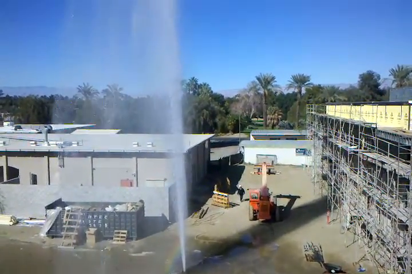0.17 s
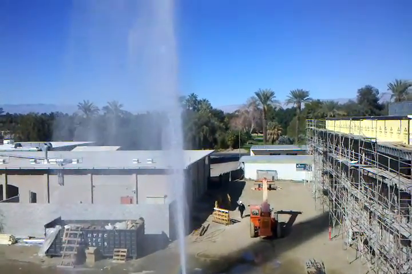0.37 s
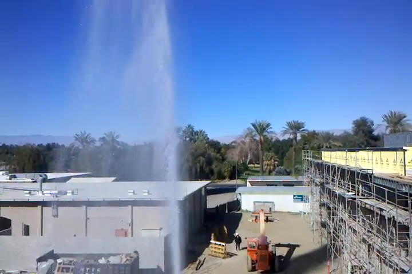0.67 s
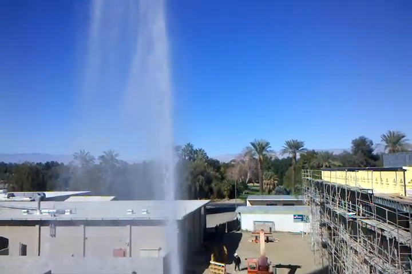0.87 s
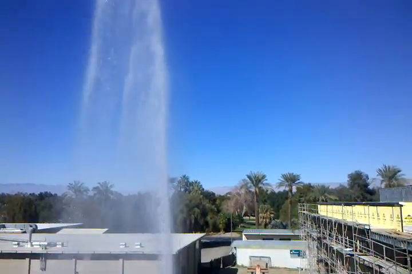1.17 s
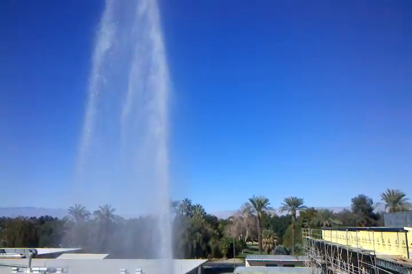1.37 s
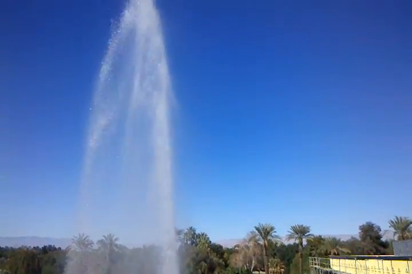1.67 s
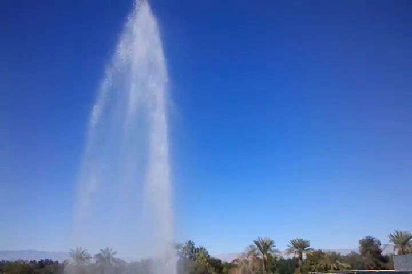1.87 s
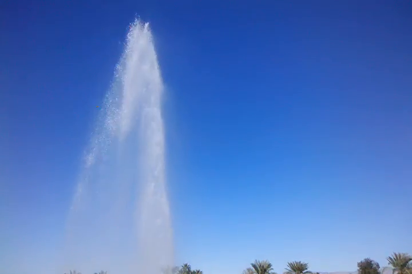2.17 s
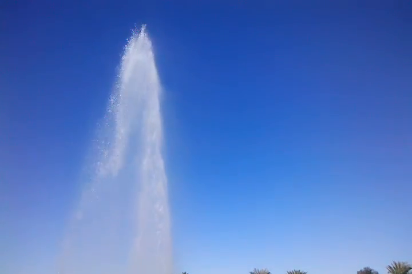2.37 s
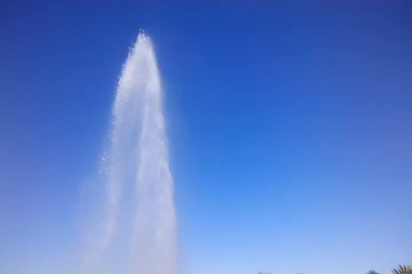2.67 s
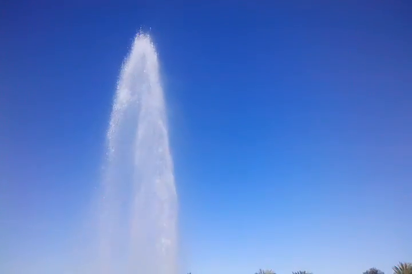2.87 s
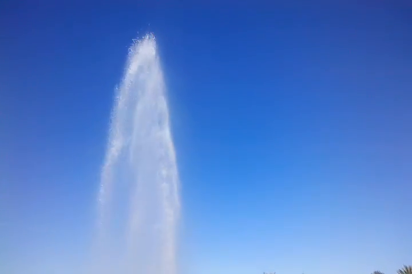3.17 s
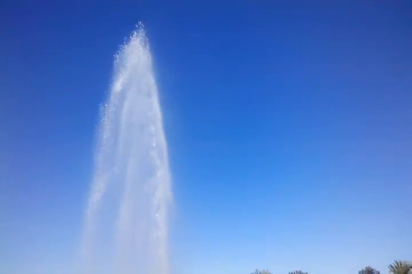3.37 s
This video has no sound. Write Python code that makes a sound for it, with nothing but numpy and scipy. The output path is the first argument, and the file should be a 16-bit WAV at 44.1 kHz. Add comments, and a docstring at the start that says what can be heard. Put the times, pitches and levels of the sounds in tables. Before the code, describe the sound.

A tall water jet sprays with a loud, steady, bright hiss and uneven splashing on wet ground, outdoors at a building site; a faint engine drones far off, and handheld microphone bumps come near the end.

```python
"""Water jet on a building site

A tall jet hisses out of a pipe and splashes onto the ground: shaped noise, with damped rings as drops.
The hiss brightens as the camera tilts up. An engine drones far off: two wavering sine tones.
Near the end the camera's case is bumped (short damped modes and noise); the hardest knock ducks the gain.
The camera widens its stereo by cross-feeding its two ports."""
import sys
import numpy as np
from scipy import signal
from scipy.fft import rfft, irfft, next_fast_len
from scipy.io import wavfile
from scipy.ndimage import uniform_filter1d, map_coordinates

SR = 44100
rng = np.random.default_rng(int(sys.argv[2]) if len(sys.argv) > 2 else 0)


def generate_wav(signal):
    """Clip the signal to [-1, 1] and save it as 16-bit WAV at the path in sys.argv[1]."""
    frames = np.transpose(np.atleast_2d(signal))
    scaled = np.clip(frames, -1, 1) * 32767
    pcm = np.round(scaled).astype(np.int16)
    wavfile.write(sys.argv[1], SR, pcm)


N = 154791
TOP_HZ = 14000  # ceiling of drop pitch and of the output band


def amp(db):
    """Decibels to amplitude gain."""
    return 10 ** (np.asarray(db) / 20)


def unit(x):
    """Scale to rms 1 over all channels."""
    return x / np.sqrt(np.mean(x ** 2) + 1e-20)


def along(points, hz):
    """Interpolate (f/Hz, value) points on a log frequency axis."""
    f, v = np.transpose(points)
    return np.interp(np.log(hz + 1), np.log(f + 1), v)


def curves(rows):
    """One value per sample for each column after the time."""
    t_s, *cols = np.transpose(rows)
    return [np.interp(np.arange(N) / SR, t_s, c) for c in cols]


def wobble(knots_per_s):
    """A smooth random curve through normally distributed knots."""
    knots = rng.standard_normal(1024)
    return map_coordinates(knots, [np.arange(N) * knots_per_s / SR], mode="mirror")


def filtered(x, response):
    """Multiply the spectrum of x by a function of frequency."""
    m = next_fast_len(N + SR // 2)
    return irfft(rfft(x, m) * response(np.fft.rfftfreq(m, 1 / SR)), m)[..., :N]


def low_cut(x, hz):
    """Second-order high-pass."""
    sos = signal.butter(2, hz / (SR / 2), "highpass", output="sos")
    return signal.sosfilt(sos, x)


def at_ports(pair, spectrum):
    """Colour two unrelated signals and mix them to the ports' coherence and balance; rms 1."""
    # Likeness of the two ports: f/Hz, coherence
    coherence = [(60, -0.47), (150, 0.081), (300, 0.7), (600, 0.65), (1200, 1), (1700, 0.91), (2300, 0.3),
                 (2950, 0.56), (3800, -0.33), (14000, 0.16)]
    # Right port over left: f/Hz, level/dB
    right_lean = [(60, 1), (200, 3.5), (500, 1), (1000, 3), (1600, -2), (2200, 10), (3700, 3), (4600, 2.5),
                  (7000, -0.2), (12000, 0.5)]

    def mid_side_gains(hz):
        angle = np.arccos(np.clip(along(coherence, hz), -1, 1)) / 2
        return amp(along(spectrum, hz)) * [np.cos(angle), np.sin(angle)]

    def left_right_gains(hz):
        angle = np.arctan(amp(along(right_lean, hz)))
        return np.array([np.cos(angle), np.sin(angle)])

    mid, side = filtered(pair, mid_side_gains)
    return unit(filtered(np.array([mid + side, mid - side]), left_right_gains))


def rush(spectrum, patchy_db):
    """Turbulent water: coloured stereo noise of rms 1 with time-frequency patches of random gain."""
    z = signal.stft(rng.standard_normal((2, N)), nperseg=512)[2]
    field = rng.standard_normal(z.shape[1:])
    field = uniform_filter1d(field, size=6, axis=0)
    field = uniform_filter1d(field, size=16, axis=1)
    patchy = signal.istft(z * amp(patchy_db * unit(field)), nperseg=512)[1][:, :N]
    return at_ports(patchy, spectrum)


def wandering_band(x, centre_rows, gain_db, octaves):
    """Lift a band whose centre wanders, 1/e half-width in octaves; rms 1."""
    hz, t, z = signal.stft(x, SR, nperseg=1024)
    centre_hz = np.interp(t, *np.transpose(centre_rows))
    away = np.log2((hz[:, None] + 1) / centre_hz) / octaves
    lifted = z * amp(gain_db * np.exp(-away ** 2))
    return unit(signal.istft(lifted, nperseg=1024)[1][:, :N])


def engine():
    """Distant engine: its firing tone fades as the camera turns away; a faint drone wavers above it."""
    # Firing tone before wobble and port balance: t/s, f/Hz, level/dB
    firing_rows = [(0, 82.6, -71), (.15, 82.7, -54), (.5, 84.6, -53.5), (.8, 85.4, -50.5),
                   (1.05, 87.6, -62), (1.3, 86.8, -66), (3.4, 87, -78)]
    drone_hz, drone_db = 241, -56.5  # centres of the wobble
    hz, level_db = curves(firing_rows)

    def tone(f):
        return np.sqrt(2) * np.sin(2 * np.pi * np.cumsum(f) / SR)

    firing = amp(level_db + 1.1 * wobble(9.1)) * tone(hz + 0.45 * wobble(10.03))
    drone = amp(drone_db + 3.2 * wobble(3.83)) * tone(drone_hz + 4 * wobble(15))
    return firing * np.array([[.55], [1.4]]) + drone


def rumble():
    """Low rumble under the splash: wavering noise that slowly fades."""
    # Spectrum: f/Hz, relative level/dB
    rumble_spectrum = [(25, -18), (55, -8), (85, -11), (120, 0), (240, 1), (330, -2.5), (600, -12),
                       (1500, -42)]
    start_db, fade_db_per_s = -45, 1
    level_db = start_db - fade_db_per_s * np.arange(N) / SR + 1.2 * wobble(4.6)
    return amp(level_db) * rush(rumble_spectrum, patchy_db=0.5)


def drops():
    """Single drops slap the wet ground, each a very short damped ring."""
    drops_per_s, level_db, low_hz = 500, -46, 251  # level before port balance
    median_hz, spread, decay_cycles = 1870, 0.5, 2.3  # amplitude falls by e^-2 in decay_cycles
    when, size, pitch = rng.random((int(drops_per_s * N / SR), 3)).T
    log_odds = np.log(pitch / (1 - pitch))
    hz = np.clip(median_hz * np.exp(spread * log_odds / 2), 300, TOP_HZ)
    t = np.arange(SR // 200) / SR
    cycles = hz[:, None] * t
    strength = amp(-3 * np.log(size + 0.001))[:, None]
    rings = strength * np.sin(2 * np.pi * cycles) * np.exp(-2 * cycles / decay_cycles)
    where = (when * N).astype(int)[:, None] + np.arange(len(t))
    patter = np.bincount(where.ravel(), rings.ravel(), N)[:N]
    return amp(level_db) * unit(low_cut(patter, low_hz)) * np.array([[.7], [1.2]])


def splash():
    """Sheets of water land in uneven surges: noise whose brightest band wanders at random."""
    # Surges before offset and wobble: t/s, level/dB
    level_rows = [(0.0, -32.5), (0.1, -32.5), (0.54, -33), (0.75, -31), (1.23, -33), (1.3, -30.5),
                  (1.82, -33.5), (2.64, -34.5), (2.88, -32.5), (2.89, -34.5), (3.17, -32.5), (3.22, -33)]
    # Wandering band centre, one random path: t/s, f/Hz
    band_rows = [(0.25, 940), (0.58, 1180), (0.78, 1460), (1.001, 1340), (1.3, 1090), (1.55, 1100),
                 (1.95, 1266), (2.599, 1310), (2.86, 1040), (3.05, 1380), (3.4, 1330)]
    # Spectrum: f/Hz, relative level/dB
    splash_spectrum = [(40, -60), (100, -23.5), (250, -10.5), (450, -3.5), (620, -6.5), (800, -3.5),
                       (1000, -1.1), (1350, -3), (1800, -7), (2200, 0), (2800, -1), (5000, -22)]
    offset_db = 3
    level_db, = curves(level_rows)
    water = rush(splash_spectrum, patchy_db=0.83)
    water = wandering_band(water, band_rows, gain_db=2.5, octaves=0.27)
    return amp(level_db + offset_db + 0.58 * wobble(12) + 0.75 * wobble(110)) * water


def bumps():
    """Knocks snap and thump the plastic case: damped modes and noise, reaching the right port first."""
    # Knocks: t/s, level/dB, ring f/Hz, ring t60/s, snap relative level/dB
    knocks = [(3.2541, -0.5, 1130, 0.0048, -30), (3.297, -35, 497, 0.098, -35),
              (3.3843, 17, 660, 0.0075, -16)]
    rise_s, left_lag_s, left_gain_db, low_hz = 0.0009, .0004, 6, 470
    overtone_ratio, overtone_db, overtone_t60_s = 1.75, -3, 0.0045
    snap_hz, snap_t60_s, crack_corner_hz, crack_db = 5000, 0.0055, 7000, 6
    out = np.zeros((2, N))
    for start_s, level_db, ring_hz, ring_t60_s, snap_db in knocks:
        t = np.maximum(np.arange(N) / SR - start_s - np.array([[left_lag_s], [0]]), 0)

        def mode(hz, t60_s):
            return np.sin(2 * np.pi * hz * t) * amp(-60 * t / t60_s)

        overtone = amp(overtone_db) * mode(ring_hz * overtone_ratio, overtone_t60_s)
        ring = mode(ring_hz, ring_t60_s) + overtone
        rise = 1 - np.exp(-(t / rise_s) ** 2)
        crack = filtered(rng.standard_normal(N), lambda hz: 1 / (1 + (hz / crack_corner_hz) ** 4))
        crack = amp(crack_db) * crack * (t > 0) * amp(-60 * t / snap_t60_s)
        snap = mode(snap_hz, snap_t60_s) + crack
        out += amp(level_db) * (amp(snap_db) * snap - 2 * rise * ring)
    return low_cut(out, low_hz) * amp([[left_gain_db], [0]])


def jet():
    """Nozzle hiss: noise flutters with the flow and changes colour as the camera tilts up."""
    # Hiss before offset and wobble: t/s, level/dB
    level_rows = [(0.0, -28.5), (0.87, -28), (0.94, -28.5), (2.66, -27), (3.1, -27.5)]
    # Spectrum looking ahead: f/Hz, relative level/dB
    ahead_spectrum = [(100, -60), (800, -39), (1700, -9.5), (2150, 1), (2750, -6), (3400, 3.5),
                      (4300, -1.5), (5300, 0.5), (6500, 1.5), (7800, 1), (9000, -4), (10200, -8),
                      (11800, -13), (14000, -13.5)]
    # Spectrum looking up: f/Hz, relative level/dB
    up_spectrum = [(100, -60), (800, -32), (1700, -14.5), (2200, -9), (2900, -1.5), (3650, 1), (4500, -7),
                   (5600, -5), (6600, -0.5), (7500, 2), (8900, -3.5), (10400, -9), (11800, -12),
                   (14000, -11.5)]
    offset_db, tilt_start_s, tilt_end_s = 3.5, 1, 2.5
    level_db, = curves(level_rows)
    fade_angle, = curves([(tilt_start_s, 0), (tilt_end_s, np.pi / 2)])  # equal-power crossfade
    ahead = np.cos(fade_angle) * rush(ahead_spectrum, patchy_db=2.0)
    up = np.sin(fade_angle) * rush(up_spectrum, patchy_db=1.56)
    return amp(level_db + offset_db + 0.31 * wobble(17) + 0.65 * wobble(90)) * (ahead + up)


def scene():
    """Sum of all sources at the two ports."""
    return engine() + rumble() + drops() + splash() + bumps() + jet()


def widen(x):
    """Subtract a delayed share of the other channel; sound common to both cancels near one over the delay."""
    # Cross-feed: f/Hz, share of the other port
    crossfeed = [(400, 0.13), (800, 0.61), (1300, 0.4), (3300, 1), (4400, 0.74), (6000, 0.15),
                 (10000, 0.22), (13000, 0.28)]
    inverse_delay_hz = 2941.5

    def share(hz):
        return np.clip(along(crossfeed, hz), 0, 1)

    other = filtered(x[::-1], lambda hz: share(hz) * np.exp(-2j * np.pi * hz / inverse_delay_hz))
    return filtered(x - other, lambda hz: 1 / np.hypot(1, share(hz)))


def empty_common_band(x):
    """A narrow band is missing from the sound common to both channels."""
    centre_hz, half_width_hz = 2941.5, 145  # 1/e half-width
    common = filtered(x.mean(axis=0), lambda hz: np.exp(-((hz - centre_hz) / half_width_hz) ** 4))
    return x - common


def gain_control(x):
    """Limiter: the gain drops just ahead of an overload and recovers slowly."""
    limit_db, release_db_per_s, attack_s, look_ahead_s = 2, 10, 0.0004, 0.0012
    level_db = 20 * np.log10(np.abs(x).max(axis=0) + 1e-9)
    over_db = np.maximum(level_db - limit_db, 0)
    t = np.arange(N) / SR
    recovery_db = release_db_per_s * t
    duck_db = np.maximum.accumulate(over_db + recovery_db) - recovery_db
    early_db = np.interp(t + look_ahead_s, t, duck_db)
    keep = np.exp(-1 / (attack_s * SR))
    return x * amp(-signal.lfilter([1 - keep], [1, -keep], early_db))


def record(dry):
    """Stereo widening, emptied common band, gain control, clipping at full scale, then band limits."""
    wide = empty_common_band(widen(dry))
    clipped = np.clip(gain_control(wide), -1, 1)
    return filtered(low_cut(clipped, 60), lambda hz: hz < TOP_HZ)


dry = scene()
out = record(dry)
generate_wav(out)
```